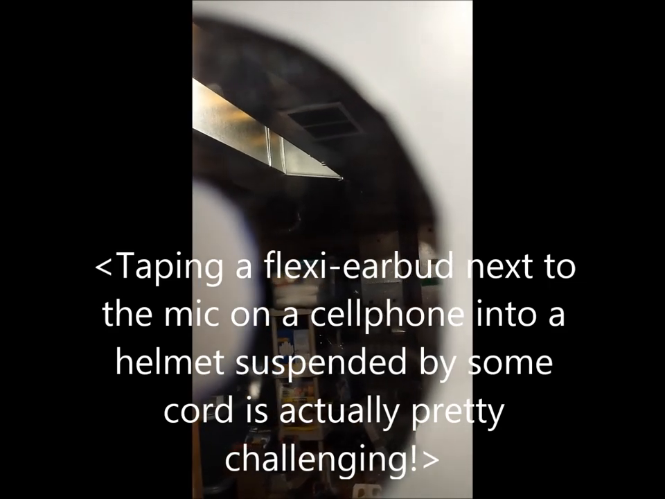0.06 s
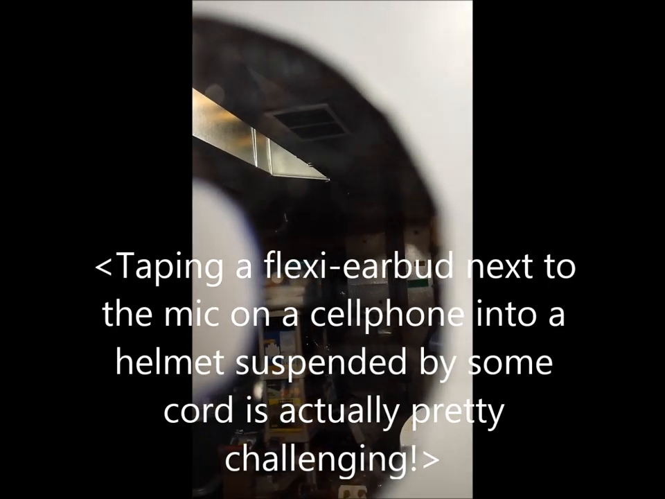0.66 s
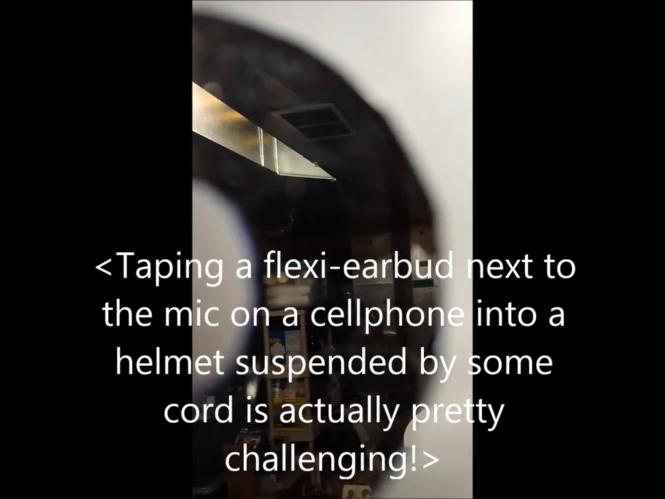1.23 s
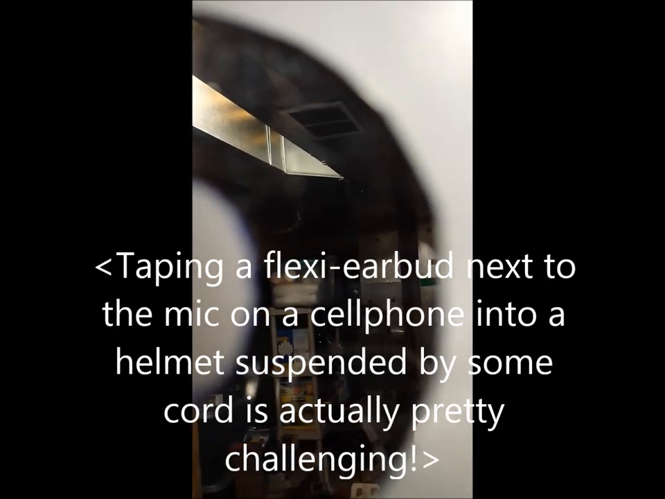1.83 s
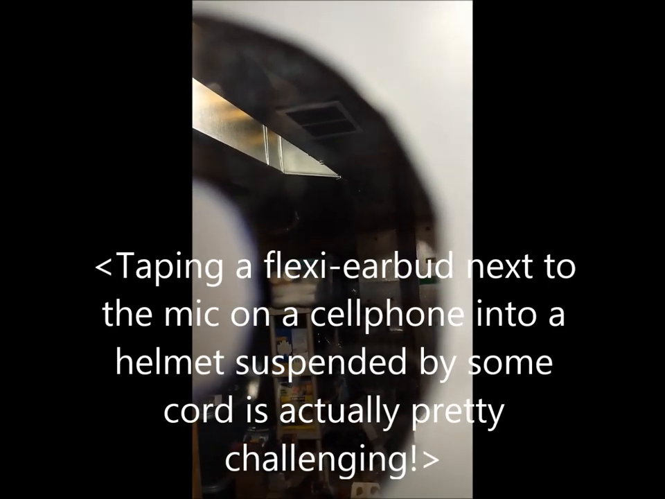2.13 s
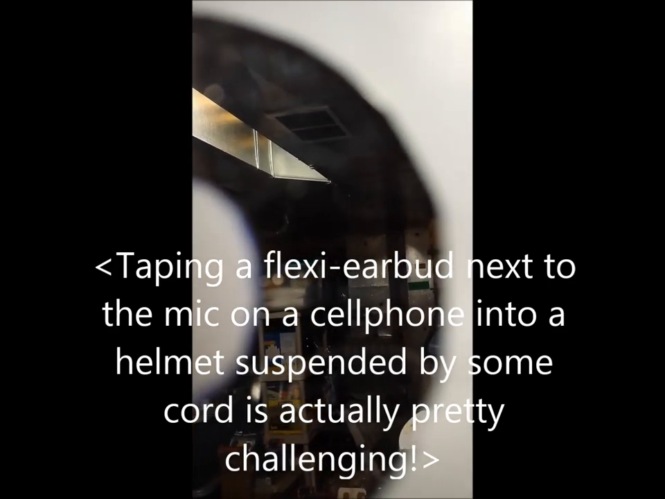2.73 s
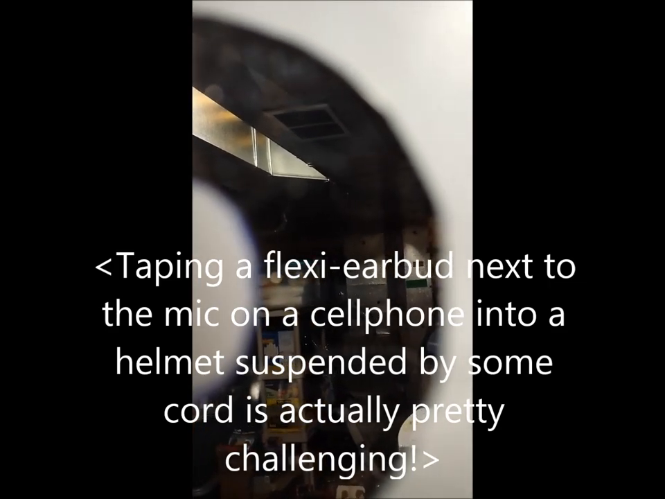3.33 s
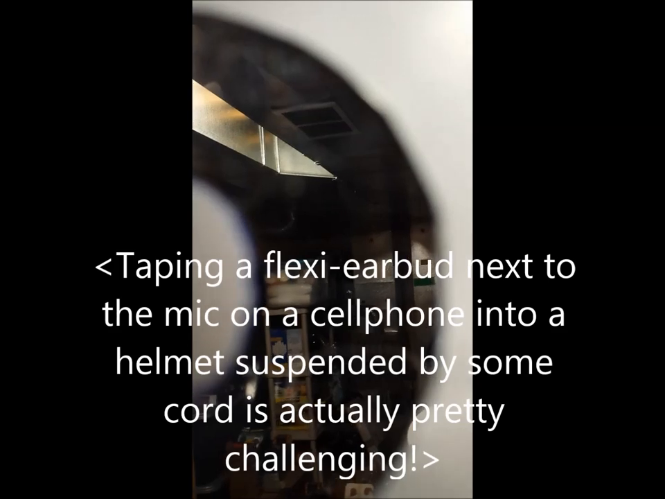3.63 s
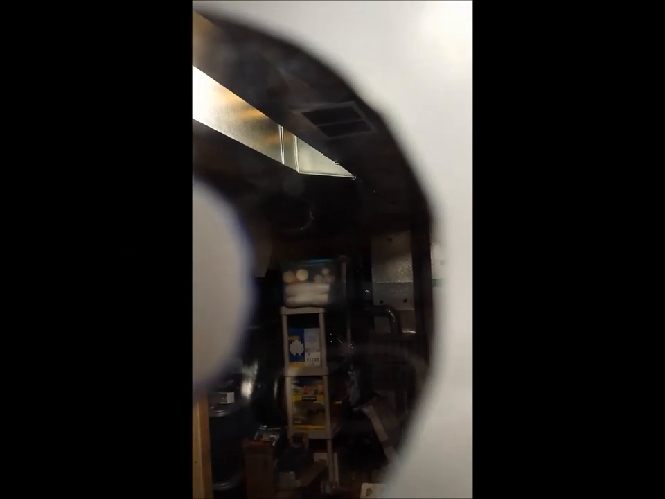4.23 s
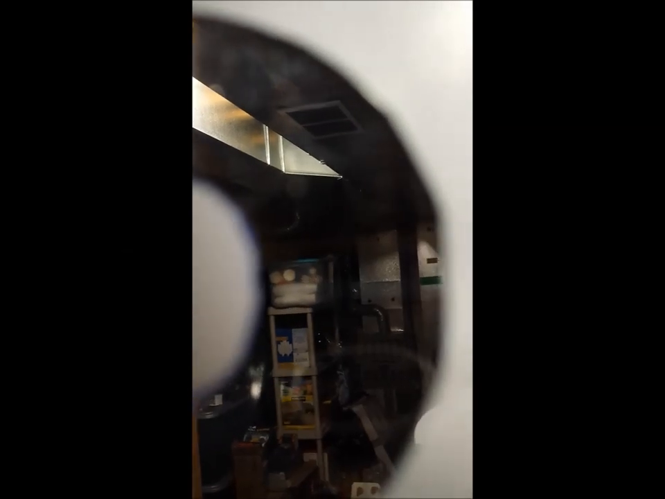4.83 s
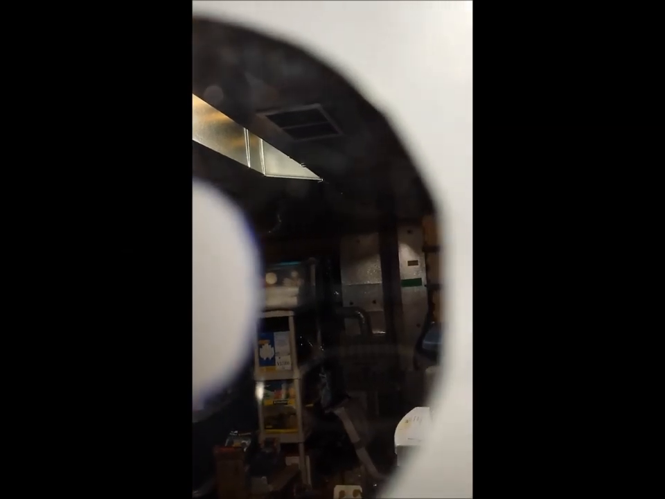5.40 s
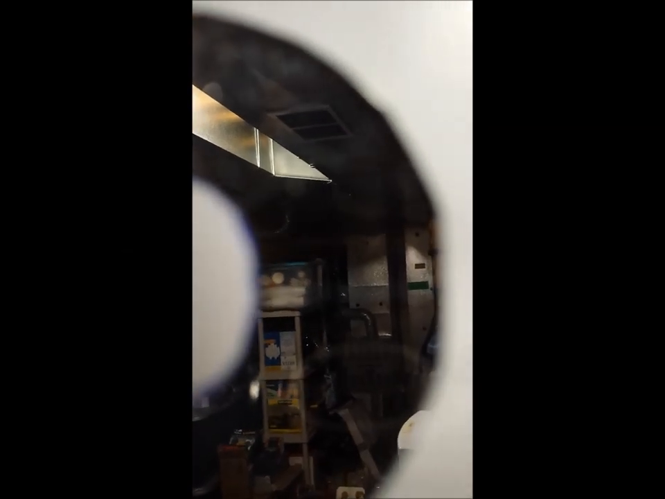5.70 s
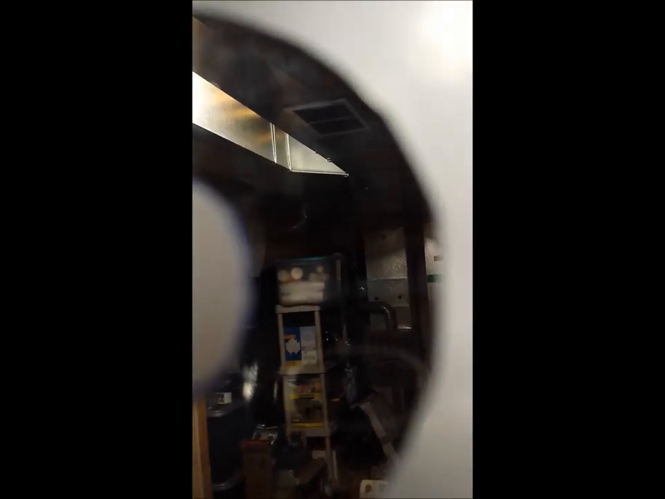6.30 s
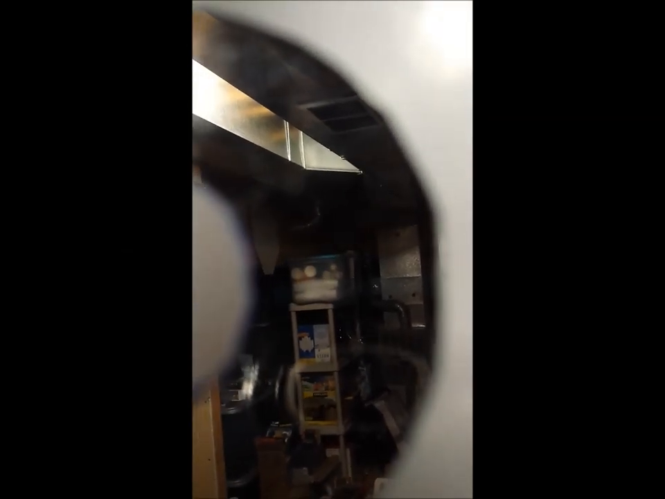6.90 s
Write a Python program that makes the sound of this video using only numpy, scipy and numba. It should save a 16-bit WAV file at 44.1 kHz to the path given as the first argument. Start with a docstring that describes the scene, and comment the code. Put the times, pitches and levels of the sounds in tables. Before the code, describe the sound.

Sticky tape is smoothed down next to a phone's microphone in a quiet room. A few faint rustles give way to irregular scraping strokes, clusters of gluey crackles and muffled bumps on the phone's case. The rubbing eases briefly near the end, then returns with a few more scuffs and thumps. Everything is extremely close, with no echo.

```python
"""Fingers rub and press adhesive tape onto a phone, right beside its microphone.
Each stroke is a stream of tiny slips that rings the tape film, hisses and rumbles in the case;
the glue lets go in ticks and snaps. Presses thump the air pocket under the tape, whose pitch
falls as the finger seals it. A quiet room lies behind."""
import sys
import numpy as np
from scipy import signal
from scipy.fft import rfft, irfft
from scipy.io import wavfile
from scipy.ndimage import uniform_filter1d
from numba import njit

SR = 44100
rng = np.random.default_rng(int(sys.argv[2]) if len(sys.argv) > 2 else 0)


def unload_wav(signal):
    """Save mono or channel-first audio to the path in sys.argv[1] as 16-bit WAV at rate SR, clipped to [-1, 1]."""
    wavfile.write(
        sys.argv[1],
        SR,
        np.round(np.clip(np.atleast_2d(signal).T, -1, 1) * 32767).astype(np.int16),
    )


N = 306495
T = np.arange(N) / SR
# EQ of the path from the tape film to the microphone: (frequency [Hz], gain [dB])
FILM_EQ = [(300, -32), (550, 5), (750, 3.5), (950, 5), (1300, 0.5), (1800, -1.5), (2850, -0.5), (3400, -3),
           (4100, -9.5), (5500, -14.5), (8000, -39.5)]
# EQ of the path the hiss takes to the microphone: (frequency [Hz], gain [dB])
HISS_EQ = [(2500, -21.5), (4200, -3), (5200, -0.5), (6500, -3), (7500, 0.5), (9000, 0.5), (10300, -5),
           (11500, -5), (13200, -2), (15500, -8.5)]


def undb(db):
    """Decibels to gain."""
    return 10 ** (np.asarray(db) / 20)


def unit(x):
    """Scale to rms 1."""
    return x / np.sqrt(np.mean(x ** 2))


def colour(x, points, size=8192):
    """Minimum-phase EQ through (frequency [Hz], gain [dB]) points; white noise keeps its level."""
    hz, db = np.transpose(points)
    grid = np.maximum(np.arange(size // 2 + 1) * SR / size, 1)
    gain = undb(np.interp(np.log(grid), np.log(hz), db))
    cepstrum = irfft(np.log(gain))
    cepstrum[1:size // 2] *= 2
    cepstrum[size // 2 + 1:] = 0
    response = irfft(np.exp(rfft(cepstrum)))
    return signal.fftconvolve(x, response / np.linalg.norm(response))[:len(x)]


@njit
def resonate(x, hz, q):
    """State-variable band-pass whose centre can move every sample."""
    out, band, low = np.empty(len(x)), 0., 0.
    for i in range(len(x)):
        g = np.tan(np.pi * hz[i] / SR)
        v = (band + g * (x[i] - low)) / (1 + g * (g + 1 / q))
        band, low, out[i] = 2 * v - band, low + 2 * g * v, v / q
    return out


def split(x, hz):
    """Crossover: the parts of x below and above hz."""
    low = signal.sosfiltfilt(signal.butter(2, hz, fs=SR, output="sos"), x)
    return low, x - low


def drift(hz):
    """Smooth random modulation, rms 1."""
    hold = max(int(SR / hz), 1)
    steps = np.repeat(rng.standard_normal(N // hold + 1), hold)
    return unit(uniform_filter1d(steps, hold)[:N])


def slips(per_s, spread_db):
    """Tiny impulses at random times, a few much larger than the rest; rms 1."""
    sizes = undb(spread_db * np.minimum(rng.exponential(size=N), 3.7))
    return unit((rng.random(N) < per_s / SR) * sizes * rng.choice([-1, 1], N))


def add(out, s, x):
    """Mix x into out at time s."""
    i = max(int(s * SR), 0)
    out[i:i + len(x)] += x[:max(N - i, 0)]


def room_tone(level_db=-88):
    """A steady bed of room hush and microphone noise."""
    # spectrum of the bed: (frequency [Hz], gain [dB])
    room_eq = [(20, -42), (70, 7), (140, 5), (250, -25.5), (600, -17), (2000, -40), (6000, -24),
               (16000, -29)]
    return undb(level_db) * colour(rng.standard_normal(N), room_eq)


def finger_motion(step_s=.001, edge_db=11.5, flatness=2.35, quiet_s=1):
    """Control curves for the rubbing: each stroke swells and fades, and the loudest leads the tone."""
    # strokes over the tape: (start [s], swell [s], fade [s], film level [dB], film resonance [Hz],
    # hiss send [dB], top treble trim [dB], case rumble send [dB])
    strokes = [(0.15, 0.25, 0.13, -87.5, 2000, 5.5, 4, 3), (0.41, 0.032, 0.028, -75.5, 1900, -5, -2, 6),
               (0.516, 0.22, 0.056, -81.5, 2460.0, 0.5, 2.0, 6.5),
               (0.751, 0.0065, 0.18, -57.0, 1480.0, -5, 10.5, 12.0),
               (0.884, 0.048, 0.028, -59.0, 2540.0, -0.5, 2, 1),
               (0.921, 0.086, 0.182, -59.5, 1480, -6.5, 11, 11.5),
               (1.129, 0.045, 0.083, -57.5, 1730, -8.5, 5, 9.5),
               (1.26, 0.084, 0.065, -57.5, 1740.0, -5, 2.0, 11.5),
               (1.386, 0.061, 0.078, -65.5, 1550.0, -4.5, 5, 13),
               (1.509, 0.043, 0.098, -58.5, 2010.0, -1, 1.5, 9.5),
               (1.656, 0.015, 0.042, -52, 2400, 0, 1, 6), (1.743, 0.12, 0.036, -66.5, 2300.0, -2.5, 4, 12),
               (1.93, 0.015, 0.064, -67, 1390, -8, 7, 9.5), (2.029, 0.099, 0.04, -56.5, 1570, -9, 5, 7),
               (2.137, 0.061, 0.054, -53.5, 1770, -12.5, 5, 7.5),
               (2.237, 0.11, 0.04, -59.5, 1480, -12, -4, 7.5), (2.41, 0.35, 0.1, -64.5, 1400, -6, -4, 11),
               (2.546, 0.04, 0.062, -56.5, 1900, -16, 0.5, 7),
               (2.746, 0.056, 0.036, -55.5, 1810.0, -13, 2, 4.5),
               (2.9, 0.059, 0.1, -49, 2260, -14.5, -1.5, 0), (3.03, 0.06, 0.1, -50.5, 1300, -10, -4, 3),
               (3.06, 0.06, 0.06, -54, 1700, -4, -4, 0), (3.17, 0.05, 0.023, -58.5, 2000, -4, -5, 7.5),
               (3.268, 0.011, 0.05, -61, 1270, -15, -5, 16),
               (3.32, 0.064, 0.076, -64, 1500, -6.5, -5.5, 11),
               (3.482, 0.024, 0.05, -59.5, 2500.0, -5.5, -3, 7.5),
               (3.617, 0.032, 0.025, -61.5, 2470.0, -10, 2.0, 4.5),
               (3.73, 0.11, 0.13, -63, 1720, -6.5, 2, 11), (3.975, 0.035, 0.058, -58, 1400, -13, -6, 12),
               (4.016, 0.014, 0.036, -44, 1350, -19, -12, 0), (4.125, 0.14, 0.06, -58, 1600, -12, 2, 7),
               (4.184, 0.02, 0.034, -50, 1630, -19, 3, 0), (4.278, 0.019, 0.035, -50.5, 1650, -7.5, -3, 0),
               (4.352, 0.04, 0.031, -46, 1450, -10, -6, 4),
               (4.457, 0.072, 0.054, -52.0, 1630.0, -7.5, -4, 5.0),
               (4.56, 0.072, 0.028, -50.0, 1410, -9.5, -4.0, 3.5),
               (4.683, 0.047, 0.081, -56.5, 1310, -10, -3, -0.5),
               (4.775, 0.057, 0.302, -69, 1530.0, -7.5, 6, 4.5),
               (5.096, 0.075, 0.031, -57, 2080, -1.5, 3, 0.5),
               (5.143, 0.18, 0.048, -65.0, 1880, -4.0, -0.0, 5.5),
               (5.413, 0.085, 0.038, -57.5, 1600.0, -6.5, 5.5, 5),
               (5.571, 0.06, 0.03, -59.0, 1500, -6, -4, 13.5),
               (5.671, 0.083, 0.15, -55.0, 1360, -10.5, -6, 0),
               (5.875, 0.03, 0.031, -57.5, 900, -14.5, -1, 12),
               (5.95, 0.072, 0.063, -60, 1310, -11.5, -3, 5.0),
               (6.157, 0.01, 0.019, -65, 1410, -18, -6, 3.5), (6.195, 0.027, 0.071, -75, 1300, -18, 5, 5.5),
               (6.363, 0.047, 0.165, -65.5, 1170, -13.0, -2, 7.5),
               (6.458, 0.046, 0.019, -54, 1220.0, -10.0, -10, 6.5),
               (6.66, 0.06, 0.06, -55, 1300, -13, -4, 5), (6.735, 0.035, 0.019, -51, 1250, -9, -2, -2),
               (6.804, 0.0038, 0.009, -48, 1900, -19, -9, -1),
               (6.889, 0.036, 0.051, -66.5, 1160.0, -10, -9, 16.5)]
    # the finger at rest: (film level [dB], film resonance [Hz], hiss send [dB],
    # top treble trim [dB], case rumble send [dB])
    resting = (-79, 1600, -8, 2, 10)
    t = np.arange(0, N / SR + step_s, step_s)
    levels_db = [resting[0] - 16.5 * (t < quiet_s)]  # the resting finger is quieter for the first second
    for start, swell, fade, db, *_ in strokes:
        past_peak = t - start - swell
        distance = np.maximum(-past_peak / swell, past_peak / fade)  # 1 at the stroke's edges
        levels_db.append(db - edge_db * np.minimum(distance, 10) ** flatness)
    power = undb(levels_db) ** 2
    total = power.sum(axis=0)
    tones = np.transpose([resting[1:]] + [row[4:] for row in strokes])
    blend = tones @ (power / total)
    return [np.interp(T, t, curve) for curve in (10 * np.log10(total), *blend)]


def film_rasp(x, direct_db=-4.5, q=7.04, flicker_db=3.7):
    """The film's modes slide and come and go as the finger changes where it is pinned."""
    # bending modes of the taut film: (frequency [Hz], level [dB])
    film_modes = [(760, -5), (1300, -6), (1680, 0.5), (2300, -6), (2900, -5.5)]
    out = undb(direct_db) * x
    for hz, db in film_modes:
        gain = undb(db + flicker_db * drift(hz=55))
        out += gain * resonate(x, hz * np.exp(.08 * drift(hz=35)), q)
    return out


def port_hiss(x, top_db):
    """Hiss enters the microphone port; the tape flutters over it, so the top treble flickers."""
    dull, top = split(colour(x, HISS_EQ), hz=10000)
    return dull + undb(top_db - 3.4 + 2.0 * drift(hz=150)) * top


def case_rumble(x, case_db, boxy_db=5, boom_per_db=1.05):
    """Slips in the case ring the air pocket: boxy when weak against the rub, boomy when strong."""
    # EQ of the path through the case: (frequency [Hz], gain [dB])
    case_eq = [(25, -27), (42, -7.5), (65, 0), (100, 0.5), (160, -0.5), (230, -2), (320, -5.5), (480, -5.5),
               (680, -13.5), (1000, -28), (2000, -61.5)]
    # air pocket tuning, which drops once the tape is stuck down: (time [s], pitch [Hz])
    pocket_pitch = [(3.05, 146.4), (3.3, 75)]
    low, high = split(colour(x, case_eq), hz=300)
    pocket = resonate(low, np.interp(T, *np.transpose(pocket_pitch)), q=2.5)
    boom = undb(-3.5) * low + undb(-4.5) * pocket
    tilt = undb((boxy_db - boom_per_db * case_db) / 2)
    return boom / tilt + high * tilt


def rubbing(film_db, film_hz, hiss_db, top_db, case_db):
    """Skin drags over the film: fine slips in uneven gusts, with a light crackle of glue on top."""
    grip = undb(film_db + 2.1 * drift(hz=45) + 1.62 * drift(hz=300))
    drag = slips(per_s=9000, spread_db=3.0) * grip
    crackle = slips(per_s=260, spread_db=5.5) * undb(film_db)
    # the free patch of film changes size under the finger, so its resonance wanders
    centre_hz = np.clip(film_hz * np.exp(0.28 * drift(hz=60)), 400, 6000)
    rasp = film_rasp(colour(drag + undb(-9.5) * crackle, FILM_EQ))
    film = undb(2.5) * resonate(rasp, centre_hz, q=0.72)
    hiss = port_hiss((undb(-0.46) * drag + undb(-4.5) * crackle) * undb(hiss_db), top_db)
    case_send = undb(case_db + 1.2 + 2.96 * drift(hz=27))
    return film + hiss + case_rumble(drag * case_send, case_db)


def glue_ticks(film_db, drive_db=-81, follow=0.15):
    """Lone threads of glue let go with tiny bright ticks, even while the finger hardly moves."""
    gain = undb(drive_db + follow * (film_db - np.median(film_db)))
    ticks = slips(per_s=26, spread_db=4.0) * gain
    _, bright = split(colour(ticks, HISS_EQ), hz=9500)
    return bright


def snap_cues(max_lead_s=.012):
    """Cue each snap, plus a weaker, brighter thread of glue that parts just ahead of it."""
    # glue and creases snapping: (time [s], drive [dB], ring [Hz], hiss send [dB], knock send [dB])
    snaps = [(0.2268, -75.5, 2400, 5, -11), (0.256, -78, 2300, 10, -5), (0.4458, -64, 2180, -13, -1),
             (.7527, -42, 850, -36, 2), (1.069, -47.5, 2110, -14, 1.5), (1.3382, -44.5, 2300, -11, 3),
             (1.3849, -41.5, 1570, -9, 2.5), (1.3901, -41, 2020, -11, 1.5), (1.4751, -56, 2800, 0, -11),
             (1.5268, -42.5, 1040, -11, 9), (1.6706, -32, 2300, -7, -5), (1.764, -58.5, 1590, -13, 11),
             (1.8602, -47, 2380, -2, 4.5), (1.9416, -57, 1590, -16, 5.5), (2.0751, -43, 2010, -24, 2),
             (2.3452, -53, 2300, -4, 7), (2.369, -34.5, 1400, -12, -3), (2.4826, -47, 2800, -10.5, -2),
             (2.5691, -45.5, 3250, -5, -9), (2.576, -37.5, 2680, -17, -18), (2.5927, -45, 3000, -5.5, 0),
             (2.5984, -46, 2770, -6, 0), (2.6962, -48, 2200, -5, 4), (2.7866, -39, 2420, -19, -4),
             (2.8085, -37, 1980, -25, -8), (3.307, -47.5, 1360, -13, 2), (3.3317, -45, 1150, -9, 6),
             (3.3385, -44, 1250, -11, 5), (3.3534, -40.5, 1600, -7, 5), (3.377, -35, 1990, -16, -1),
             (3.3832, -37.5, 3220, -6, -9), (3.388, -40, 2200, -3.5, -1.5), (3.4057, -42, 1700, -5, 4),
             (3.4236, -52, 2600, 1, -9), (3.4474, -47, 3000, -7, -10), (3.5041, -39.5, 2640, -7.5, -15),
             (3.5233, -50.5, 2400, 0.5, -2), (3.5326, -39, 2960, -8, -30), (3.5355, -37.5, 1410, -11, -21),
             (3.5461, -52, 2900, 0, -16), (3.7425, -56, 900, -22, 10.5), (4.0301, -40.5, 1900, -31, -9),
             (4.5537, -47, 1380, -27, -9), (4.942, -55.5, 1800, -7.5, -5), (5.308, -51.5, 1400, -25, -8),
             (4.198, -53, 1600, -0.5, 2), (4.3034, -42, 2100, -20, -2.5), (4.4165, -43, 1600, -8, 3),
             (4.5955, -46, 1670, -4, -13), (4.6466, -50, 1100, -20, 6), (4.7849, -55.5, 1400, -20, 11.5),
             (4.8724, -52.5, 1400, -9.5, 6), (5.1392, -48, 2900, 3, -15), (5.1741, -46, 2400, -6, -21),
             (5.3373, -39, 4700, -19.5, -20), (5.3587, -47.5, 1600, -32, -15),
             (5.3644, -48.5, 1890, -35, -22), (5.4893, -39.5, 3460, -12, -24),
             (5.502, -46.5, 2400, -4, -10), (6.254, -71, 1200, 4, -3), (6.742, -47.5, 1790, -16, -7),
             (6.8038, -41, 2300, -15, -14), (6.8098, -44, 2200, -25, -8), (6.9011, -53, 1100, -29, 6),
             (6.9215, -44.5, 1210, -2.5, -0.5)]
    for s, db, ring_hz, hiss_db, knock_db in snaps:
        yield s, db, ring_hz, hiss_db, knock_db
        lead, weaker, higher = rng.random(3)
        thread_db = db - 17.5 * (.5 + weaker)
        thread_hz = ring_hz * 2 ** (.5 * higher)
        yield s - max_lead_s * lead, thread_db, thread_hz, hiss_db + 5, knock_db


def glue_snaps(top_db, burst_s=0.0006, burst_db=-10, knock_hz=560, size=512):
    """Glue parts in a short burst around one sharp release, which rings its crease and knocks the case."""
    # EQ of a knock through the case: (frequency [Hz], gain [dB])
    knock_eq = [(60, -19.5), (200, 4.5), (420, 0.5), (650, -2.5), (1200, -2.5), (3000, -21)]
    film, hiss, knock = np.zeros((3, N))
    lead = size // 8
    t = (np.arange(size) - lead) / SR
    impulse = signal.unit_impulse(size, lead)
    for s, db, ring_hz, hiss_db, knock_db in list(snap_cues()):
        detune = np.exp(0.16 * np.tanh(rng.standard_normal()))
        burst = undb(burst_db) * rng.standard_normal(size) * np.exp(-np.abs(t) / burst_s)
        release = impulse + burst
        ring = resonate(release, np.full(size, float(ring_hz)), q=2.3)
        body = resonate(impulse, np.full(size, knock_hz * detune), q=4.1)
        strength = undb(db) * np.sqrt(.002 * SR)  # the energy of 2 ms at the drive level
        for bus, send_db, hit in (film, 0, ring), (hiss, hiss_db, release), (knock, knock_db, body):
            add(bus, s + t[0], strength * undb(send_db) * hit / np.linalg.norm(hit))
    return (undb(-7.5) * colour(film, FILM_EQ)
            + undb(0.5) * port_hiss(hiss, top_db)
            + undb(-10) * colour(knock, knock_eq))


def pressing(seal_s=0.0076, rise_cycles=0.45, scuff_db=-17.5, scuff_hz=520., scuff_s=.01):
    """The fingertip scuffs the case; the air pocket thumps, gliding in pitch as its leak closes."""
    # finger presses: (time [s], level [dB], open pitch [Hz], sealed pitch [Hz], 60 dB decay [s])
    presses = [(.751, -30.5, 405, 139, 0.1), (.803, -31.5, 191, 111, 0.043), (1.094, -38.5, 146, 115, .07),
               (1.25, -39, 169, 138, .087), (1.528, -22.5, 224, 132, .09), (1.547, -33.5, 139, 55, 0.11),
               (1.671, -33, 395, 220, 0.026), (1.87, -44, 111, 55.4, .11), (2.076, -33.5, 293, 148, 0.043),
               (2.372, -28, 335, 119, 0.038), (2.38, -28, 120, 133, 0.096), (2.596, -31, 273, 128, .098),
               (3.05, -34, 237, 140, 0.091), (3.3, -24.5, 210, 80, 0.018), (3.743, -29.5, 176, 60, 0.12),
               (3.974, -29.5, 353, 256, 0.021), (4.385, -33, 90, 70, 0.08), (4.415, -26.5, 169, 57, 0.09),
               (4.504, -27.5, 325, 149, 0.018), (4.56, -29.5, 95, 62, .1), (4.648, -21.5, 470, 69.6, 0.056),
               (4.782, -32.5, 258, 97, 0.023), (4.797, -33.5, 100, 57, 0.17), (4.874, -40.5, 234, 59, .21),
               (5.21, -37.5, 110, 67.6, 0.17), (5.611, -35.5, 114, 60, 0.23), (5.877, -27, 150, 68, 0.12),
               (5.926, -37, 162, 65, .075), (6.112, -42.5, 151.8, 62, .07), (6.178, -41, 125, 115, .09),
               (6.386, -44.5, 122, 71, .088), (6.488, -35, 100, 80, 0.13), (6.6, -41.5, 270, 60.5, 0.12),
               (6.702, -31.5, 174, 69.4, 0.038), (6.804, -30.5, 276, 125, 0.024),
               (6.928, -28.5, 234, 82, 0.16)]
    thumps, scuff_envelope = np.zeros((2, N))
    t = np.arange(10000) / SR
    for s, db, open_hz, sealed_hz, t60 in presses:
        hz = sealed_hz + (open_hz - sealed_hz) * np.exp(-t / seal_s)
        tone = np.sin(2 * np.pi * np.cumsum(hz) / SR)
        attack = 1 - np.exp(-(t * open_hz / rise_cycles) ** 2)  # low presses build up slowly
        envelope = attack * np.exp(-np.log(1000) * t / t60)
        add(thumps, s, undb(db) * envelope / envelope.max() * tone)
        add(scuff_envelope, s, undb(db + scuff_db) * attack * np.exp(-t / scuff_s))
    scuff = rng.standard_normal(N)
    for _ in range(2):
        scuff = resonate(scuff, np.full(N, scuff_hz), q=1.6)
    return thumps + scuff_envelope * unit(scuff)


def scene():
    """Tape noises in mono, too close for any echo, over the room's hush."""
    room = room_tone()
    film_db, film_hz, hiss_db, top_db, case_db = finger_motion()
    rub = rubbing(film_db, film_hz, hiss_db, top_db, case_db)
    return (room + rub + glue_ticks(film_db) + glue_snaps(top_db) + pressing())[None]


def record(dry):
    """The phone soft-clips the hardest thumps and cuts the top."""
    ceiling, knee, cutoff_hz = .054, 6, 15800
    clipped = dry / (1 + np.abs(dry / ceiling) ** knee) ** (1 / knee)
    lowpass = signal.ellip(10, .2, 70, cutoff_hz, fs=SR, output="sos")
    return signal.sosfilt(lowpass, clipped)


dry = scene()
out = record(dry)
unload_wav(out)
```